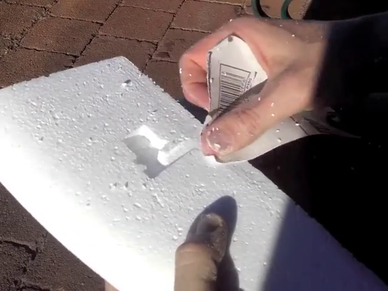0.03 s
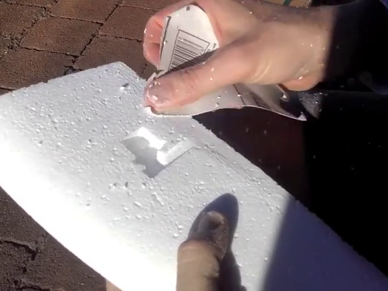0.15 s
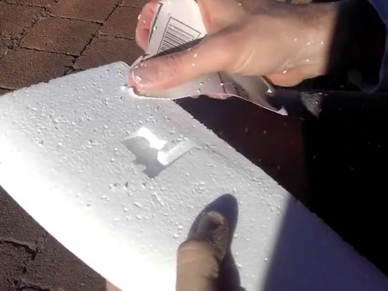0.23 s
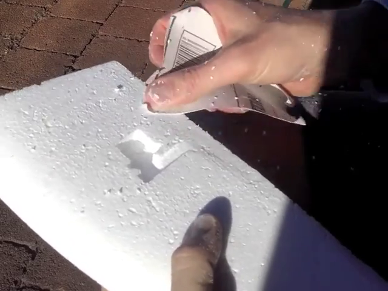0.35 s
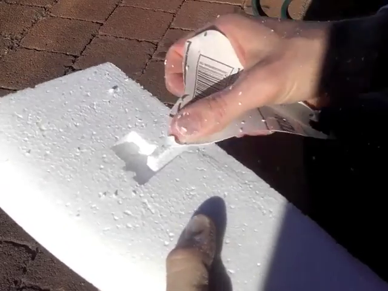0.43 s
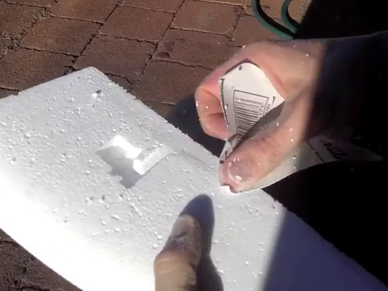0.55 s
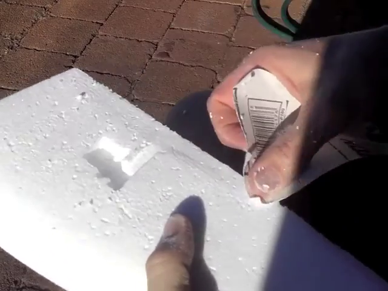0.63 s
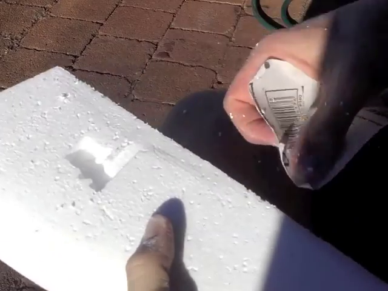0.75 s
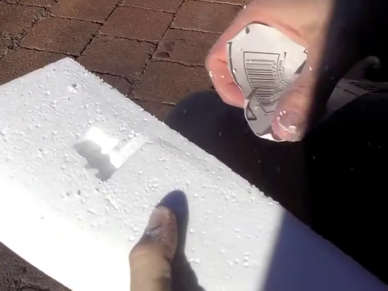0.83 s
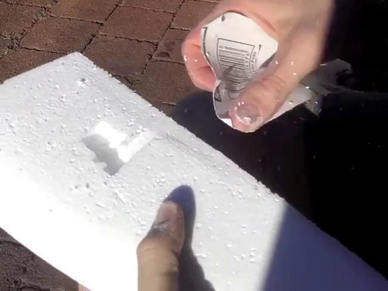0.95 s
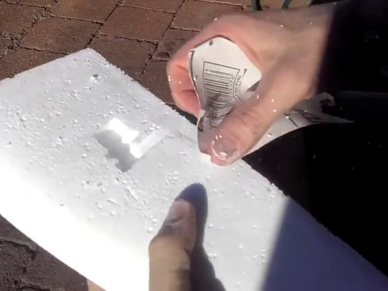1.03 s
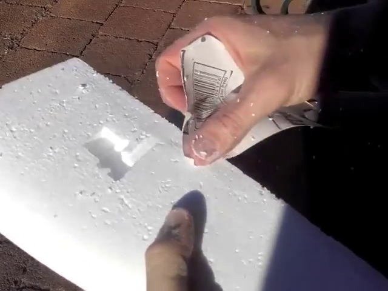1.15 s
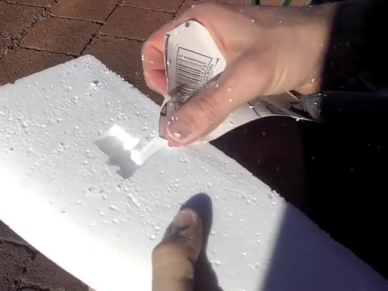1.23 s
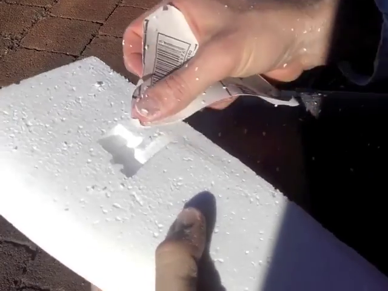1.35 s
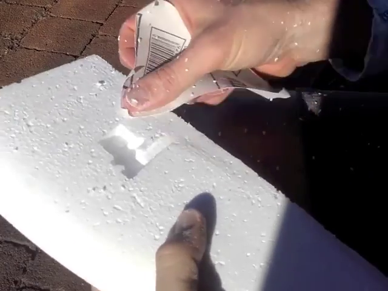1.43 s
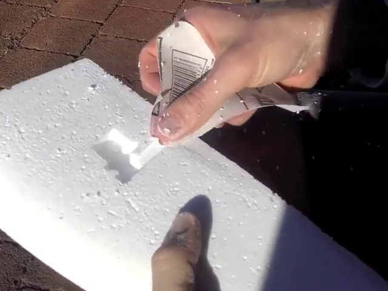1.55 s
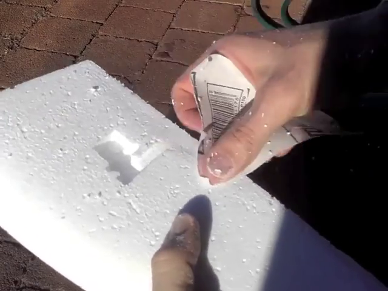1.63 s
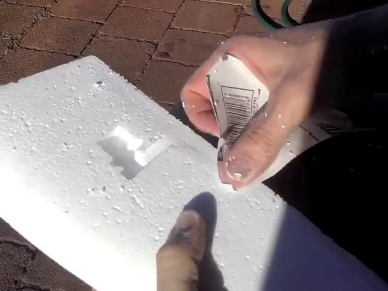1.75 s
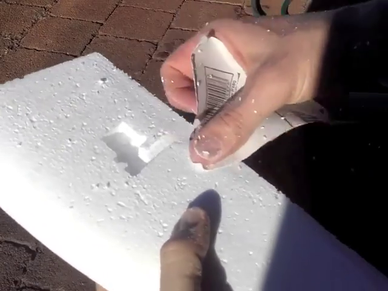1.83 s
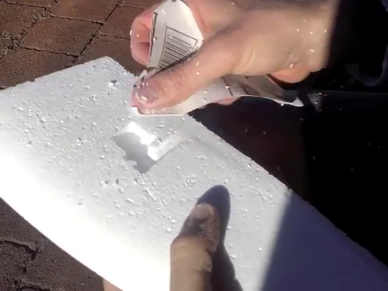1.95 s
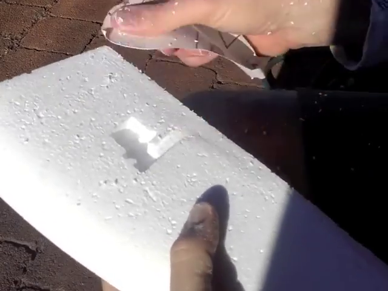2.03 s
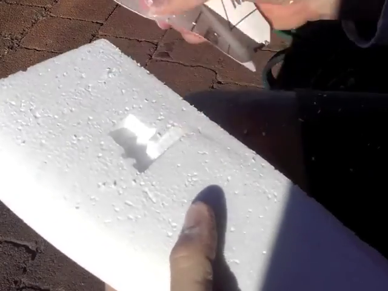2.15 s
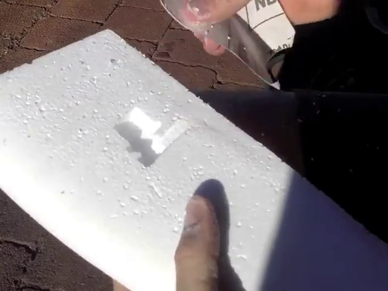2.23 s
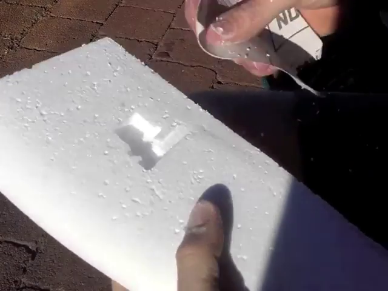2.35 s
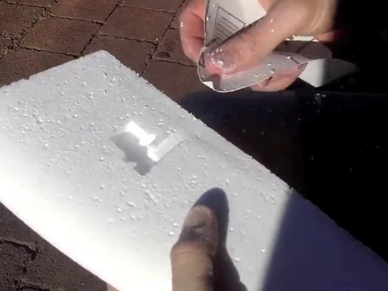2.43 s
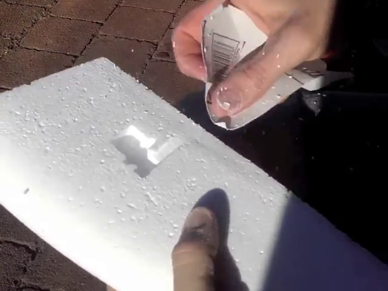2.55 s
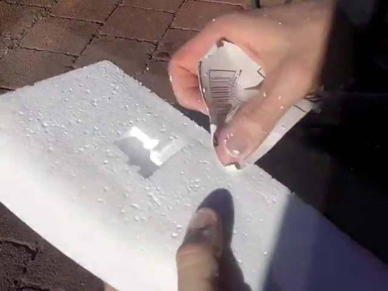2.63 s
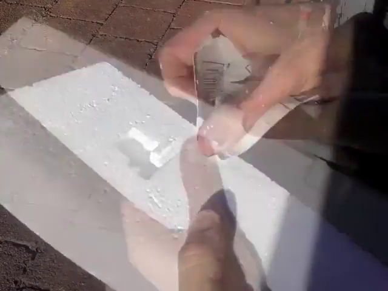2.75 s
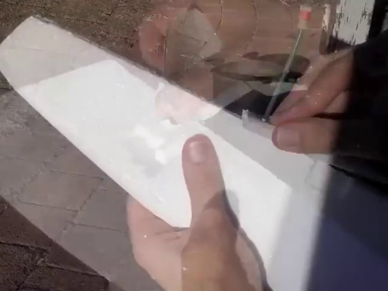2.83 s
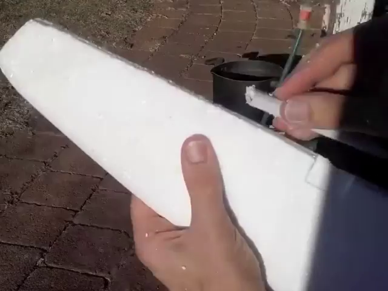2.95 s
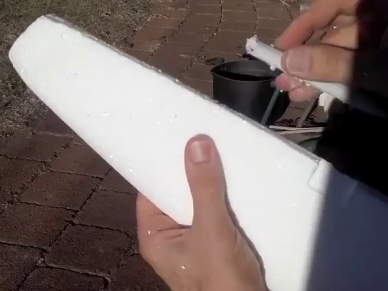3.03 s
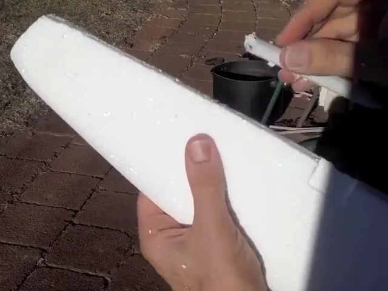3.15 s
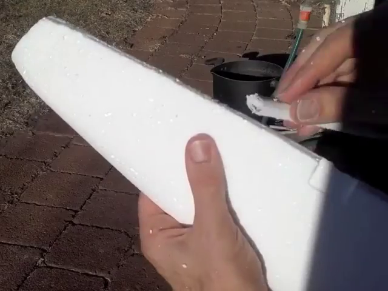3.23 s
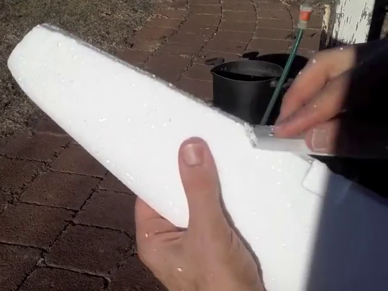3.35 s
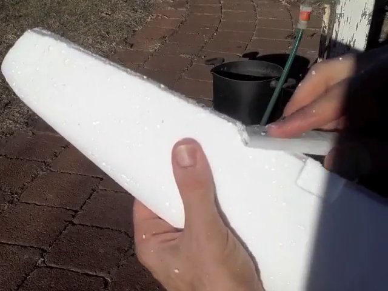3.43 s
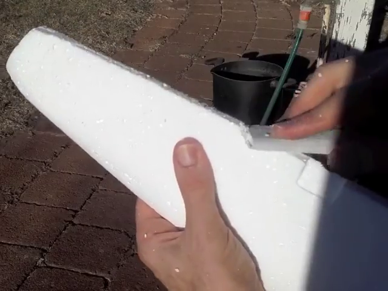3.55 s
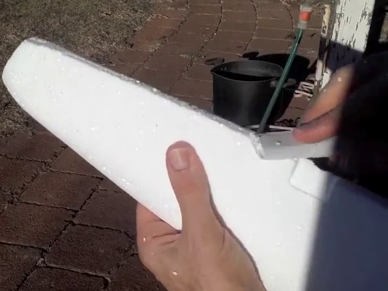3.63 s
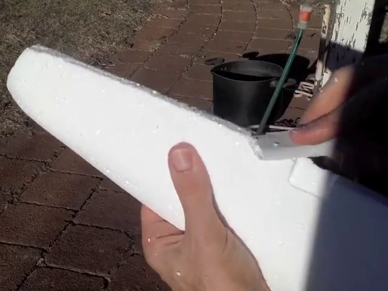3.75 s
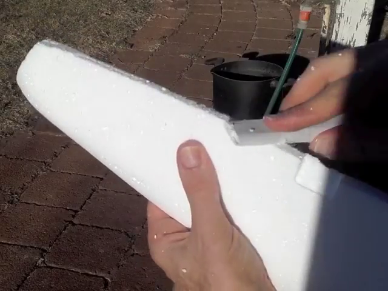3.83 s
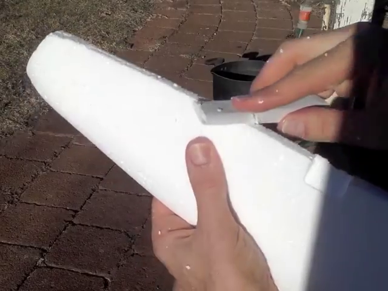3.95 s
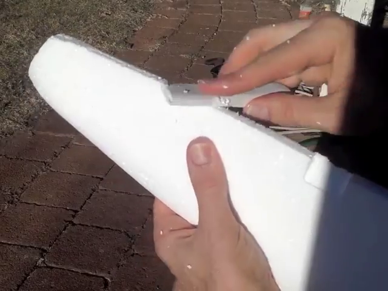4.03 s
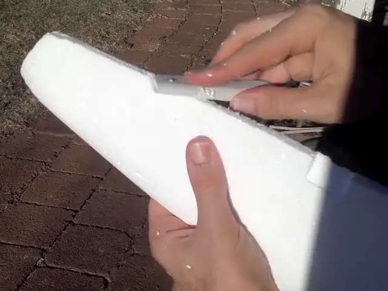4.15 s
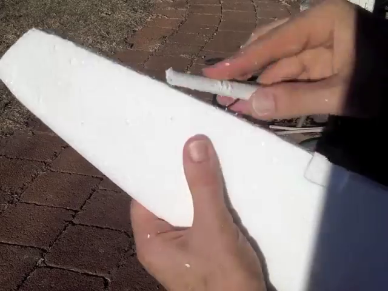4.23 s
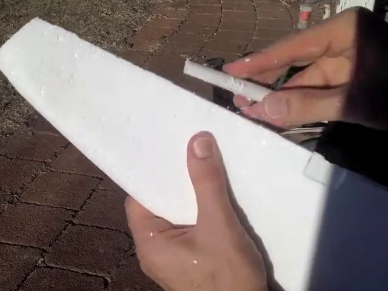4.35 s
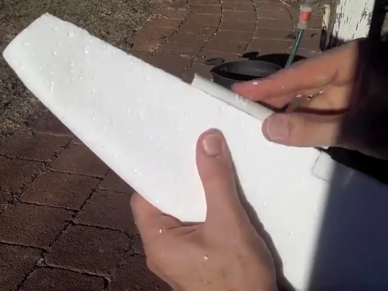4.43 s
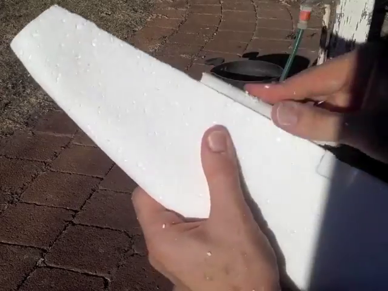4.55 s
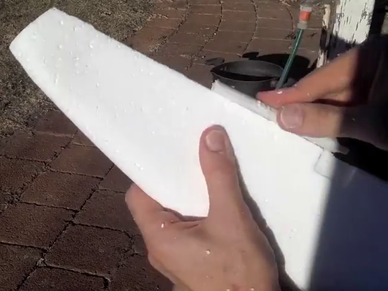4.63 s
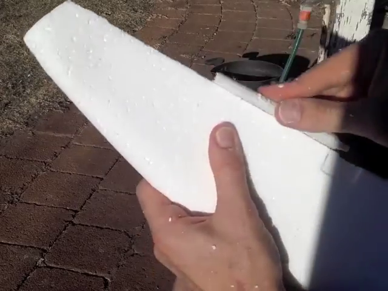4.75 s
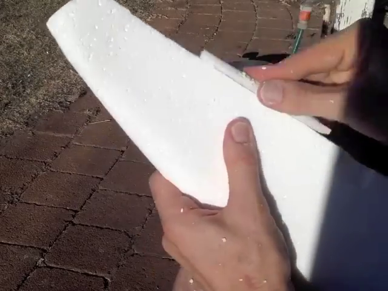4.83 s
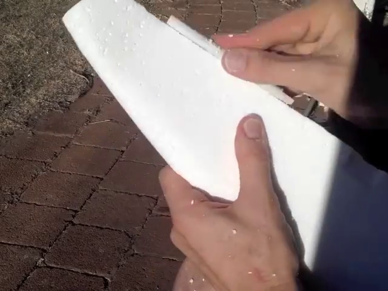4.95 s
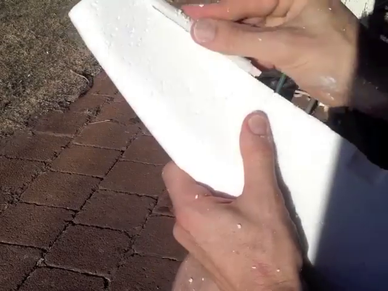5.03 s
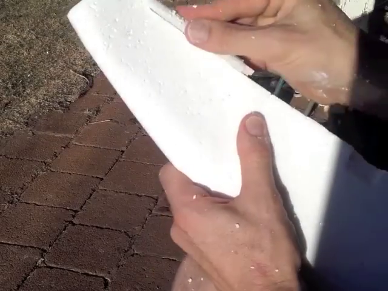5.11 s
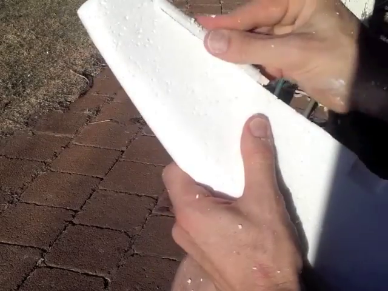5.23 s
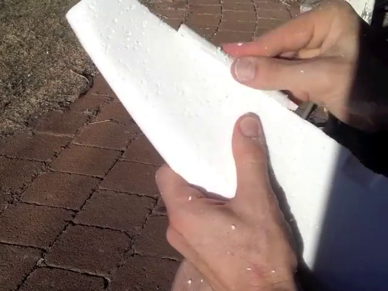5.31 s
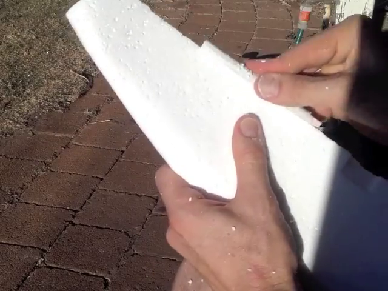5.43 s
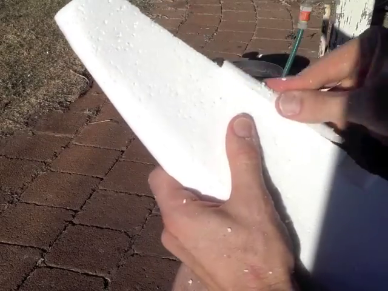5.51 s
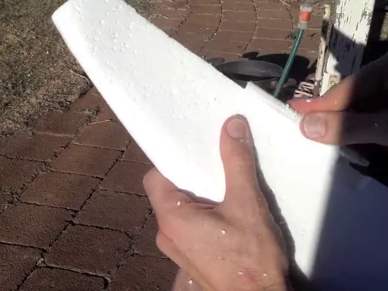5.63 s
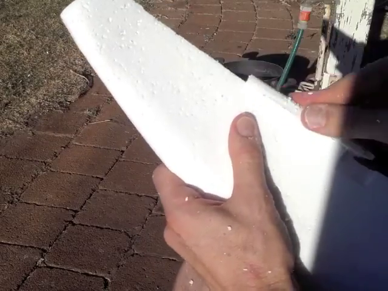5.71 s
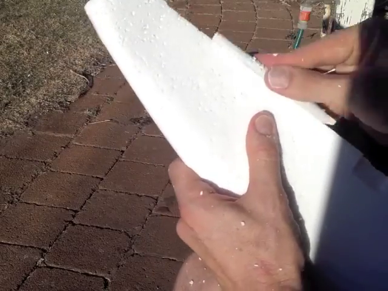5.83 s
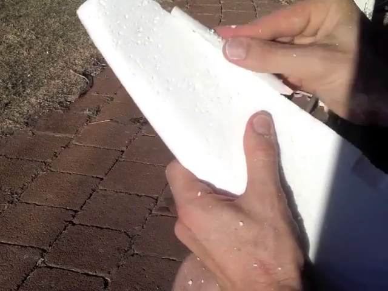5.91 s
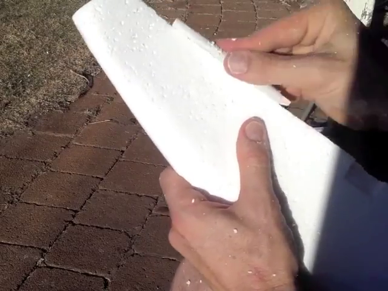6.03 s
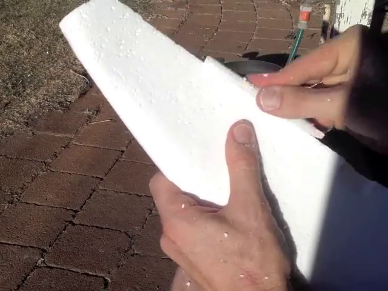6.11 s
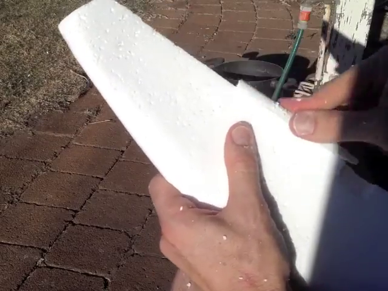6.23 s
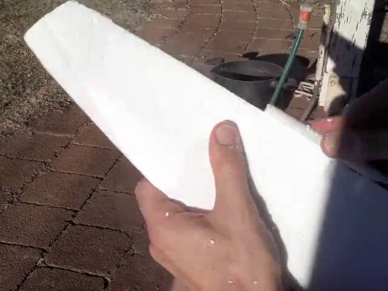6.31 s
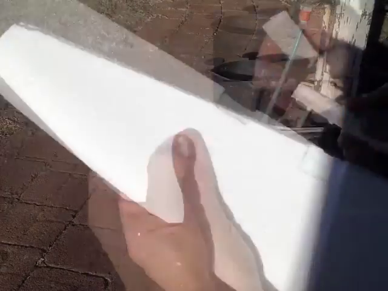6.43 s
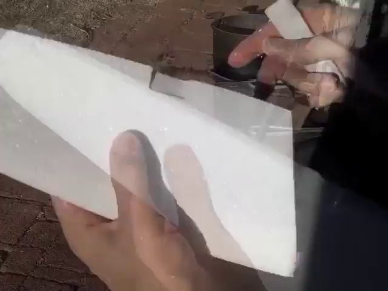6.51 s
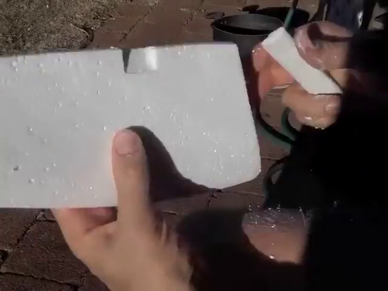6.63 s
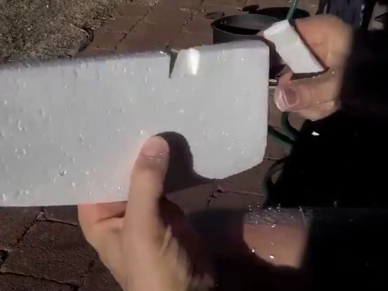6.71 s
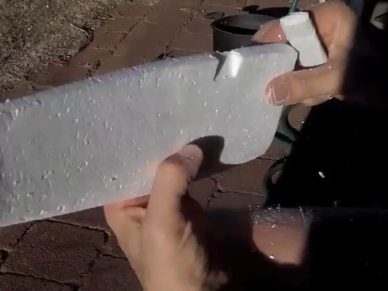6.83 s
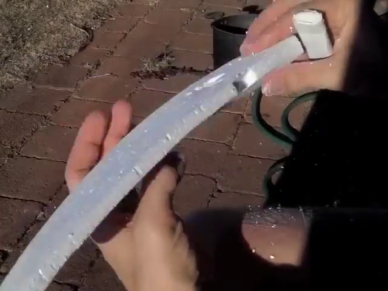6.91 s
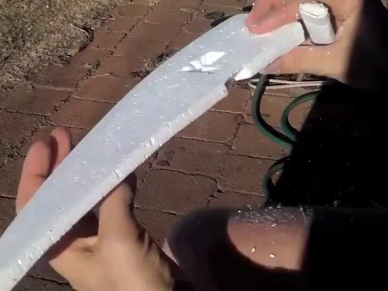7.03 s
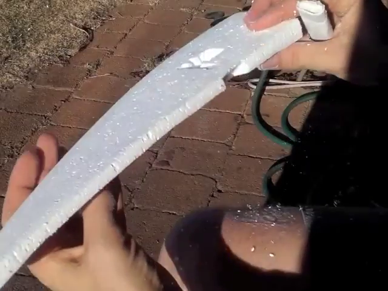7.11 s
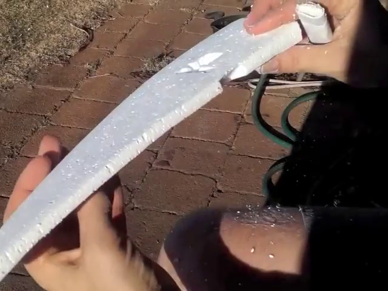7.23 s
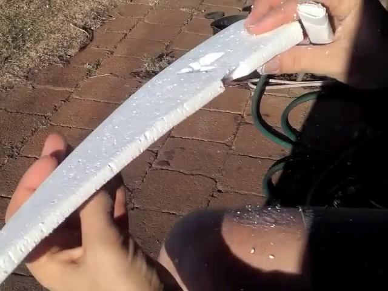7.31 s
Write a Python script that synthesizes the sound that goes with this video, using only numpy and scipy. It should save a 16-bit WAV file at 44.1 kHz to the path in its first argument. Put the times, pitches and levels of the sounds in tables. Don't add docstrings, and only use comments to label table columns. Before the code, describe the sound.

Sandpaper rasps in dry, pitched strokes over light foam, then in broader block strokes, ending in faint handling slips and bumps outdoors.

```python
import sys
import numpy as np
from scipy import signal
from scipy.io import wavfile
from scipy.ndimage import uniform_filter1d

SR = 44100
rng = np.random.default_rng(int(sys.argv[2]) if len(sys.argv) > 2 else 0)


def decibels_to_gain(level_db):
    exponent = np.asarray(level_db, float) / 20
    return 10 ** exponent


def transcribe(u):
    v = np.clip(np.atleast_2d(u).T, -1, 1)
    q = np.round(v * 32767).astype(np.int16)
    wavfile.write(sys.argv[1], SR, q)


N = 325325


def rms_one(x):
    return x / np.sqrt(np.mean(x ** 2) + 1e-20)


def at_hz(points, hz):
    curve_hz, curve_db = np.transpose(points)
    return np.interp(np.log(hz), np.log(curve_hz), curve_db)


def drift(size, rate):
    r = np.exp(-80 * np.pi * rate / SR)
    coarse = rng.standard_normal(size // 40 + 1002)
    slow = signal.lfilter([1], [1, -2 * r, r * r], coarse)[1000:]
    return np.interp(np.arange(size) / 40, np.arange(len(slow)), rms_one(slow))


def bands(sources, count):
    edges = 28 * 2 ** np.arange(0, 9.4, 1 / count)
    for k, (low, high) in enumerate(zip(edges, edges[1:])):
        sos = signal.butter(2, [low, high], "band", fs=SR, output="sos")
        yield np.sqrt(low * high), signal.sosfilt(sos, sources[k % 2])


# (frequency [Hz], level [dB per Hz])
TRAFFIC_COLOUR = [(15, -34), (25, -4), (27, -17), (66, -25.5), (144, -2.5), (414, -3), (513, 0),
                  (557, -4.5), (929, -1), (4330, -28.5), (15800, -29.5)]
# (time [s], level [dB])
TRAFFIC_LEVEL = [(0, -53.5), (1, -60), (2.9, -53.5), (3.05, -65), (3.3, -61.5), (4.4, -58.5), (6.5, -58),
                 (7.4, -59)]


def traffic(patchy_db):
    murmur_db = np.interp(np.arange(N) / SR, *np.transpose(TRAFFIC_LEVEL)) + patchy_db * drift(N, 18.3)
    noises = rng.standard_normal((2, N))
    murmur = sum(decibels_to_gain(at_hz(TRAFFIC_COLOUR, hz)) * band for hz, band in bands(noises, count=2))
    return decibels_to_gain(murmur_db) * rms_one(murmur)


def knocks(events, ring, low_hz, soft_hz, level_db):
    out = np.zeros(N)
    places = [round(s * SR) for s, _ in events]
    peaks_db = np.array(events)[:, 1] + level_db
    scatter_db = rng.normal(0, 0.7, (len(events), len(ring)))
    for k, (hz, mode_db, t60) in enumerate(ring):
        clicks = np.full(N, 1e-18)
        clicks[places] = decibels_to_gain(peaks_db + mode_db + scatter_db[:, k])
        r, w = decibels_to_gain(-60 / (t60 * SR)), 2 * np.pi * hz / SR
        out += signal.lfilter([0, -np.sin(w)], [1, -2 * r * np.cos(w), r * r], clicks)
    out = signal.sosfilt(signal.butter(3, low_hz, "high", fs=SR, output="sos"), out)
    return signal.lfilter(*signal.butter(1, soft_hz, fs=SR), out)


# (time [s], peak level [dB])
BUMP_TIMES = [
    (3.599, -33),
    (6.677, -36),
    (6.875, -24.5),
    (1.106, -32),
    (7.001, -45),
    (7.034, -45),
]
# (frequency [Hz], level [dB], decay t60 [s])
BUMP_MODES = [(206, -7, 0.031), (427, -6, 0.02), (1020, -33, 0.023), (1890, -3, .015)]


def bumps():
    return knocks(BUMP_TIMES, BUMP_MODES, low_hz=131, soft_hz=2500, level_db=-7.5)


# (time [s], peak level [dB])
SNAP_TIMES = [
    (1.1059, -47),
    (2.002, -32),
    (2.794, -30),
    (3.599, -52),
    (4.0791, -10.5),
    (4.2153, -46),
    (6.673, -41),
    (6.7693, -32),
    (6.8309, -43),
    (6.8743, -47),
]
# (frequency [Hz], level [dB], decay t60 [s])
SNAP_MODES = [(2070, -10, 0.015), (4000, -5, 0.0044), (7450, 4, 0.00078), (10800, -3, 0.0045),
              (14000, -4, .0015)]


def snaps():
    return knocks(SNAP_TIMES, SNAP_MODES, low_hz=900, soft_hz=18000, level_db=-6.0)


def grit(size, per_s, spread_db):
    sizes = decibels_to_gain(spread_db * np.minimum(rng.exponential(1, size), 5))
    signs = rng.choice([-1, 1], size)
    catches = rng.random(size) < per_s / SR
    return rms_one(sizes * signs * catches)


HAND_MOTION = dict( finger=dict(creep_db_per_s=393, bite_db=14.5, rise_db=8, rise_share=0.057, slow_db=15, slow_share=.15, cut_db=15, fade_db_per_s=330, rest_db=-77.5, travel_per_s=3.2),
               swipe=dict(creep_db_per_s=316, bite_db=11, rise_db=16, rise_share=0.33, slow_db=29.5, slow_share=0.22, cut_db=0, fade_db_per_s=850, rest_db=-82, travel_per_s=0.85),
               wipe=dict(creep_db_per_s=433, bite_db=1, rise_db=2.7, rise_share=0.045, slow_db=8.5, slow_share=.19, cut_db=6, fade_db_per_s=414, rest_db=-72.5, travel_per_s=0.092),
               block=dict(creep_db_per_s=251, bite_db=17, rise_db=6, rise_share=0.12, slow_db=7.5, slow_share=0.043, cut_db=3, fade_db_per_s=720, rest_db=-78.5, travel_per_s=.01),
               turning=dict(creep_db_per_s=455, bite_db=17, rise_db=1, rise_share=.12, slow_db=3.5, slow_share=.04, cut_db=1.5, fade_db_per_s=290, rest_db=-73, travel_per_s=.09))


def stroke_shape(strokes, times, creep_db_per_s, bite_db, cut_db, fade_db_per_s, rise_db, rise_share,
                 slow_db, slow_share, rest_db, travel_per_s):
    bite_s, cut_s = 0.0052, 0.013
    bite, length, early_db, late_db, start = np.transpose(strokes)[:, :, None]
    length, start = np.maximum(length, 0.004), np.clip(start, 0, 1)
    since, after = times - bite, times - bite - length
    phase = np.clip(since / length, 0, 1)

    level_db = early_db + (late_db - early_db) * phase
    level_db = level_db - rise_db * np.exp(-phase / rise_share)
    level_db = level_db - slow_db * np.exp((phase - 1) / slow_share)
    level_db = level_db - bite_db * np.clip(-since / bite_s, 0, 1) + creep_db_per_s * np.minimum(since, 0)
    level_db = level_db - cut_db * np.clip(after / cut_s, 0, 1) - fade_db_per_s * np.maximum(after, 0)

    power = decibels_to_gain(np.maximum(level_db, -150)) ** 2
    total = power.sum(axis=0)
    share = power / total
    toward_far_end = np.sign(0.5 - start)
    place = np.clip(start + toward_far_end * travel_per_s * length * phase, 0, 1)
    speed = np.sin(np.pi * phase)
    scrub_db = 10 * np.log10(total + decibels_to_gain(rest_db) ** 2)
    return scrub_db, (share * place).sum(axis=0), (share * speed).sum(axis=0)


COLOUR_SHIFTS = dict( finger=dict(boom_follows=0.2, rasp_follows=.63, fizz_follows=0.86, boom_db=1.5, rasp_db=12, fizz_db=4, fast_fizz_db=2.5),
                 swipe=dict(boom_follows=0.47, rasp_follows=0.83, fizz_follows=0.89, boom_db=23, rasp_db=16, fizz_db=13, fast_fizz_db=-2.1),
                 wipe=dict(boom_follows=0.54, rasp_follows=0.8, fizz_follows=.8, boom_db=4, rasp_db=9.4, fizz_db=-.6, fast_fizz_db=.8),
                 block=dict(boom_follows=.51, rasp_follows=.75, fizz_follows=.91, boom_db=11, rasp_db=6, fizz_db=12, fast_fizz_db=1.5),
                 turning=dict(boom_follows=0.41, rasp_follows=0.54, fizz_follows=1.14, boom_db=12, rasp_db=9, fizz_db=-2.7, fast_fizz_db=-.2))


def colour_shifts(scrub_db, place, speed, boom_follows, rasp_follows, fizz_follows,
                  boom_db, rasp_db, fizz_db, fast_fizz_db):
    boom = (boom_follows - 1) * scrub_db + boom_db * place
    rasp = (rasp_follows - 1) * scrub_db + rasp_db * place ** 2
    fizz = (fizz_follows - 1) * scrub_db + fizz_db * place + fast_fizz_db * speed
    return boom, rasp, fizz


# (start [s], end [s])
CONTACT_SPANS = dict(finger=(0, 2.13), wipe=(2.13, 2.63), swipe=(2.63, 3.0), block=(3.0, 6.46),
                 turning=(6.46, 7.38))


def rub(strokes, contact, colour, modes, per_s, spread_db, modes_db, wander_db, judder_db, focus_db=0,
        focus_octaves=0.12, dull_db=0, thin_db=0, ends_hz=(3300, 4120)):
    start_s, end_s = CONTACT_SPANS[contact]
    first, last = round(start_s * SR), min(round(end_s * SR), N)
    size = last - first
    times = np.arange(first, last) / SR
    coarse = times[::16]
    shape = stroke_shape(strokes, coarse, **HAND_MOTION[contact])
    scrub_db, place, speed = [np.interp(times, coarse, curve) for curve in shape]
    focus_hz = ends_hz[0] * (ends_hz[1] / ends_hz[0]) ** place
    shifts_db = colour_shifts(scrub_db, place, speed, **COLOUR_SHIFTS[contact])
    boom_db, rasp_db, fizz_db = [c - np.average(c, weights=decibels_to_gain(scrub_db) ** 2) for c in shifts_db]
    catches = [grit(size, per_s, spread_db) for _ in range(4)]

    def touch_db(hz):
        octave, centres = np.log2(hz), np.log2([750, 1250, 2000, 3000, 5200, 7500])
        boom = np.interp(octave, centres, [1, 0, 0, 0, 0, 0])
        rasp = np.interp(octave, centres, [0, 1, 1, 0, 0, 0])
        fizz = np.interp(octave, centres, [0, 0, 0, 0, 0, 1])
        near_db = focus_db * np.exp(-0.5 * (np.log2(focus_hz / hz) / focus_octaves) ** 2)
        return boom * (boom_db - thin_db) + rasp * rasp_db + fizz * (fizz_db - dull_db) + near_db

    out = np.zeros(size)
    for hz, band in bands(catches, count=4):
        if hz > 65:
            islands_db = min(hz / 1500, 0.9) * wander_db * np.tanh(drift(size, 6.1))
            out += decibels_to_gain(at_hz(colour, hz) + touch_db(hz) + islands_db) * band

    for k, (hz, width_hz, level_db) in enumerate(modes):
        r, w = np.exp(-np.pi * width_hz / SR), 2 * np.pi * hz / SR
        islands_db = 1.13 * wander_db * np.tanh(drift(size, 10.3))
        coupling = decibels_to_gain(modes_db + level_db + touch_db(hz) + islands_db)
        resonator = [(1 - r * r) / 2, 0, (r * r - 1) / 2], [1, -2 * r * np.cos(w), r * r]
        out += signal.lfilter(*resonator, coupling * catches[2 + k % 2])

    core = signal.sosfilt(signal.butter(3, [2600, 6200], "band", fs=SR, output="sos"), out)
    evened = out / np.sqrt(uniform_filter1d(core ** 2, size=3000) + 1e-9)
    uneven_beads = drift(size, 51.0) + 0.18 * drift(size, 140.0)
    return np.pad(decibels_to_gain(scrub_db + judder_db * uneven_beads) * evened, (first, N - last))


# (time [s], length [s], early level [dB], late level [dB], starting place [0-1])
WIPE_STROKES = [
    (2.135, .019, -57, -53.5, .45),
    (2.199, .034, -59, -47.5, .19),
    (2.263, .152, -53, -54.5, .75),
    (2.417, .102, -48.5, -54, .27),
]
# (frequency [Hz], level [dB per Hz])
SOFT_COLOUR = [(35, -55), (60, -51), (184, -3), (837, -3), (985, -2.5), (3240, -13), (5660, -17),
               (15800, -24)]
# (frequency [Hz], width [Hz], level [dB])
SOFT_MODES = [(673, 93, 3.5), (1070, 137, 6), (1450, 98, -3.5), (2120, 200, -28), (3560, 300, -8)]


def wipe():
    return rub(WIPE_STROKES, "wipe", SOFT_COLOUR, SOFT_MODES, per_s=8000, spread_db=3.5, modes_db=-7.0,
               wander_db=-1.0, judder_db=1.0, dull_db=6.0, thin_db=2.5)


# (time [s], length [s], early level [dB], late level [dB], starting place [0-1])
TURNING_STROKES = [
    (6.53, 0.037, -62, -56, 0.09),
    (6.674, 0.005, -51, -60, 0.57),
    (6.768, 0.014, -45.5, -56.0, 0.39),
    (6.83, 0.063, -51.0, -54.5, 0.55),
    (6.914, 0.06, -64, -55, 0.61),
    (6.968, 0.084, -56.5, -59, 0.74),
    (7.06, 0.021, -61.5, -50.5, 0.46),
    (7.231, 0.11, -84, -60, 0.61),
]


def turning():
    return rub(TURNING_STROKES, "turning", SOFT_COLOUR, SOFT_MODES, per_s=5000, spread_db=2.5, modes_db=-7.0,
               wander_db=3.0, judder_db=2.0, dull_db=1.5, thin_db=1.1)


# (time [s], length [s], early level [dB], late level [dB], how flat the block lies [0-1])
BLOCK_STROKES = [(3.036, 0.05, -55.5, -66.0, 0.09), (3.354, 0.027, -54.5, -63.0, 0.43),
                 (3.408, 0.06, -73.5, -68.5, 0.37), (3.473, 0.034, -49.0, -51.0, 0.7),
                 (3.596, 0.018, -57.0, -54.0, 0.78), (3.63, 0.094, -41.5, -48.5, 0.39),
                 (3.846, 0.334, -36.0, -42.0, 0.59), (4.214, 0.033, -41.5, -53.0, 0.59),
                 (4.253, 0.041, -49.5, -53.0, 0.94), (4.541, 0.023, -49.5, -52.5, 0.61),
                 (4.625, 0.027, -62.5, -60.5, 0.87), (4.652, 0.082, -41.0, -55.0, 0.75),
                 (4.79, 0.354, -40.0, -38.0, 0.78), (5.186, 0.046, -65.5, -67.0, 0.85),
                 (5.268, 0.22, -33.0, -42.0, 0.82), (5.468, 0.226, -39.0, -36.5, 0.75),
                 (5.781, 0.214, -33.0, -40.5, 0.8), (6.042, 0.038, -63.5, -57.0, 1.0),
                 (6.079, 0.339, -34.5, -37.0, 0.75)]
# (frequency [Hz], level [dB per Hz])
BLOCK_HISS = [(35, -69), (60, -60), (167, -4), (563, -3), (1130, 1.5), (1330, 2), (2950, -3.5), (6070, -5),
              (15800, -14)]
# (frequency [Hz], width [Hz], level [dB])
BLOCK_RESONANCES = [(850, 104, 0), (1129, 140, 3), (1816, 240, 1.5), (2130, 280, 0.5), (2880, 430, -1),
                    (3830, 520, -3), (4460, 1360, -7), (5650, 170, -48)]


def block():
    tilted_hz, flat_hz = 5100, 2350
    return rub(BLOCK_STROKES, "block", BLOCK_HISS, BLOCK_RESONANCES, per_s=12000, spread_db=2.5, modes_db=5.0,
               wander_db=3.0, judder_db=0.9, dull_db=-1.2, thin_db=-2.5, focus_db=2.5, focus_octaves=0.23,
               ends_hz=(tilted_hz, flat_hz))


# (time [s], length [s], early level [dB], late level [dB], starting place [0-1])
SWIPE_STROKE = [
    (2.633, 0.33, -45.5, -21, 1.0),
]
# (frequency [Hz], level [dB per Hz])
FINGER_HISS = [(76, -53), (130, -17), (1180, -3.5), (1730, -3.5), (2250, -8.5), (2700, 1), (3040, -1),
               (13200, -15.5), (15800, -37)]
# (frequency [Hz], width [Hz], level [dB])
FINGER_RESONANCES = [(1080, 130, -14.5), (1480, 180, -11), (1946, 77, -4), (2243, 135, -2), (3060, 78, 0),
                     (3300, 64, -36), (3743, 94, -9), (4490, 290, -5), (5030, 200, -8.5), (6030, 120, -14),
                     (6980, 104, -10), (9900, 860, -39)]


def swipe():
    return rub(SWIPE_STROKE, "swipe", FINGER_HISS, FINGER_RESONANCES, per_s=9000, spread_db=1.5, modes_db=4.5,
               wander_db=4.5, judder_db=1.05, focus_db=5, focus_octaves=0.14)


# (time [s], length [s], early level [dB], late level [dB], place along the edge [0-1])
FINGER_STROKES = [
    (0.05, 0.279, -29.5, -29.5, 0.0),
    (0.393, 0.321, -33.0, -25.0, 1.0),
    (0.8, 0.018, -61.0, -63.0, 0.43),
    (1.103, 0.044, -59.0, -57.5, 0.81),
    (1.142, 0.08, -45.0, -42.0, 0.0),
    (1.216, 0.23, -31.5, -35.0, 0.0),
    (1.407, 0.07, -33.0, -35.5, 0.85),
    (1.54, 0.227, -33.5, -26.0, 0.77),
    (1.817, 0.06, -61.5, -36.5, 0.49),
    (1.864, 0.217, -28.5, -27.0, 0.09),
]


def finger():
    return rub(FINGER_STROKES, "finger", FINGER_HISS, FINGER_RESONANCES, per_s=9000, spread_db=2.5, modes_db=6,
               wander_db=5.0, judder_db=0.5, focus_db=7.0, focus_octaves=0.12, dull_db=0.4)


def scene():
    background = traffic(patchy_db=3.0)
    blows = bumps() + snaps()
    handling = wipe() + turning()
    sanding = block() + swipe() + finger()
    mono = background + blows + handling + sanding
    return np.array([mono, mono])


def roll_off(x):
    return signal.sosfilt(signal.butter(12, 16450, fs=SR, output="sos"), x)


def record(dry):
    top_cut = signal.cheby2(14, 60, 16300, fs=SR, output="sos")
    offset = -0.0005
    mix = signal.sosfilt(top_cut, dry) + offset
    return roll_off(mix)


dry = scene()
out = record(dry)
transcribe(out)
```